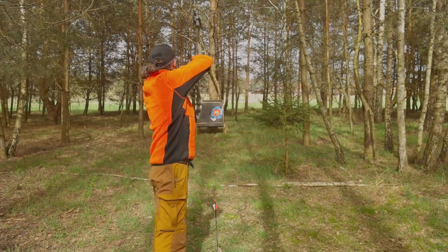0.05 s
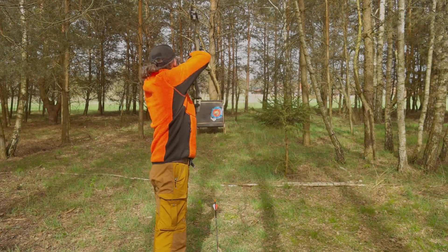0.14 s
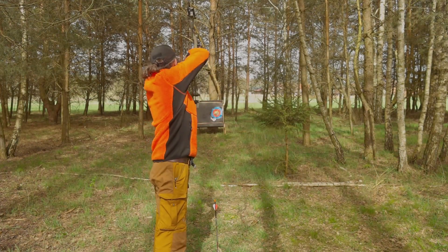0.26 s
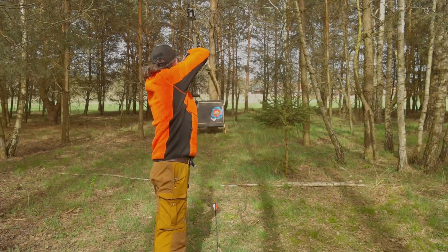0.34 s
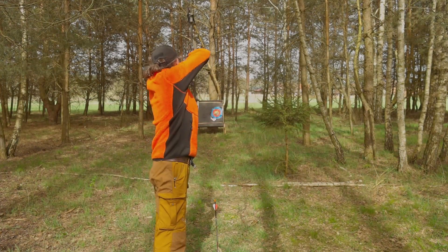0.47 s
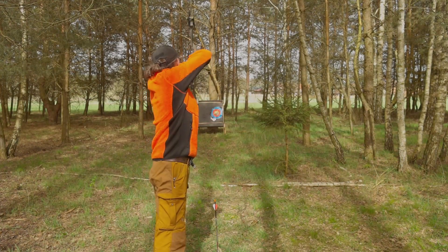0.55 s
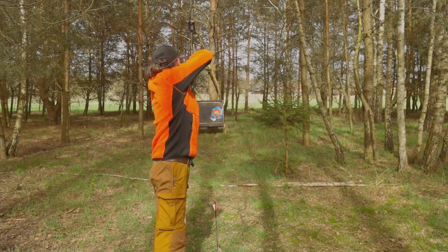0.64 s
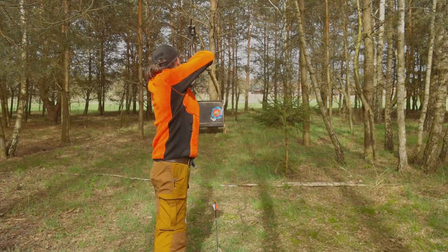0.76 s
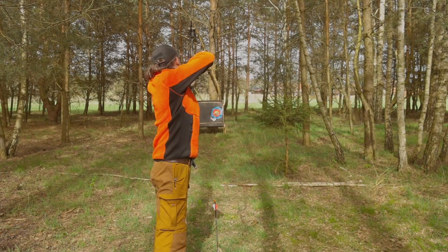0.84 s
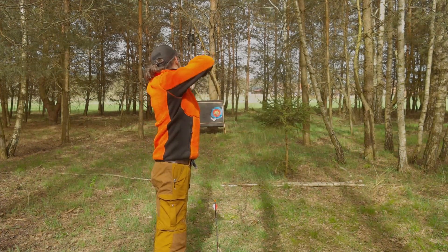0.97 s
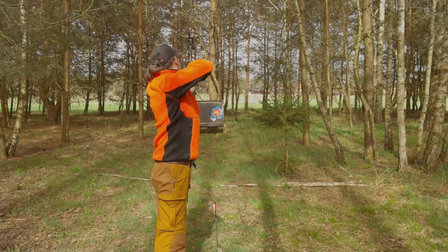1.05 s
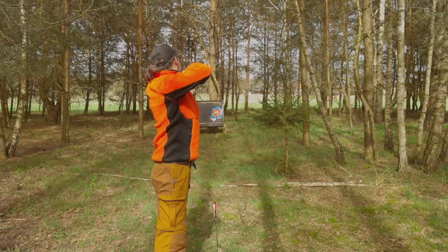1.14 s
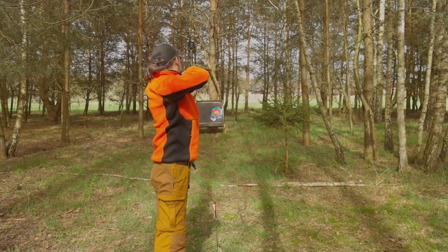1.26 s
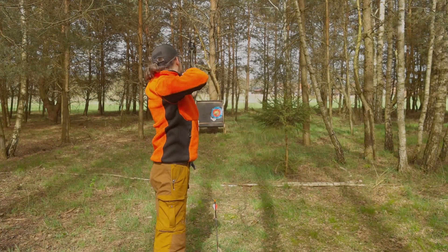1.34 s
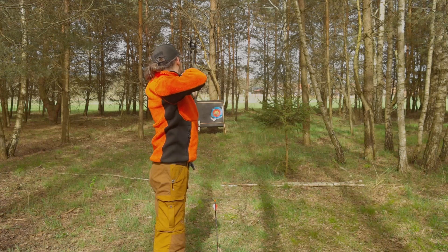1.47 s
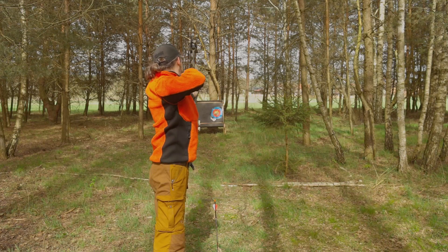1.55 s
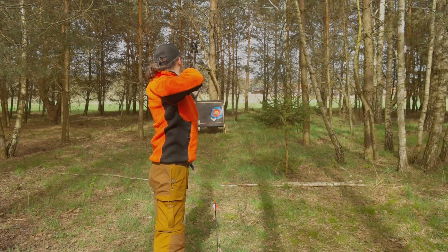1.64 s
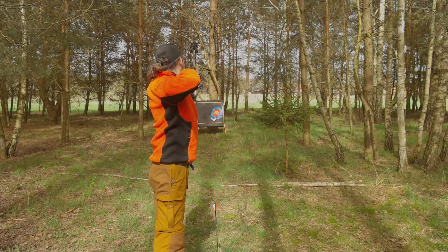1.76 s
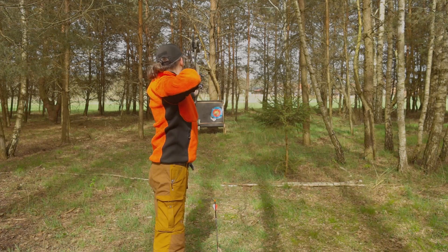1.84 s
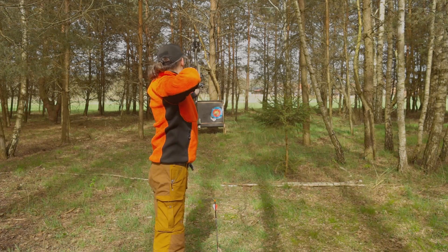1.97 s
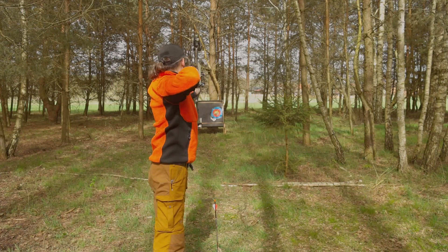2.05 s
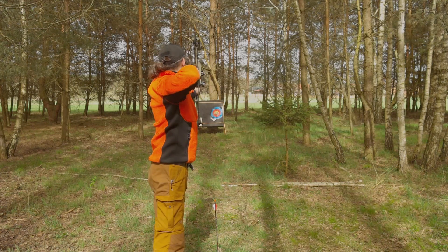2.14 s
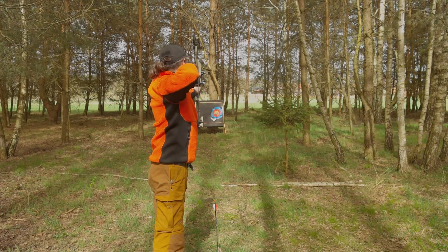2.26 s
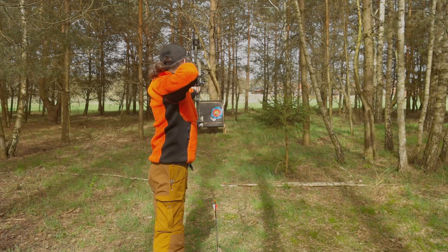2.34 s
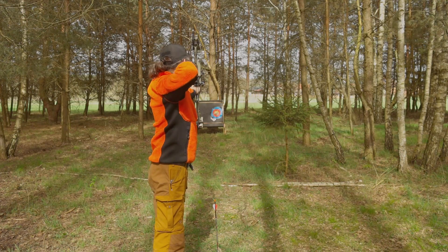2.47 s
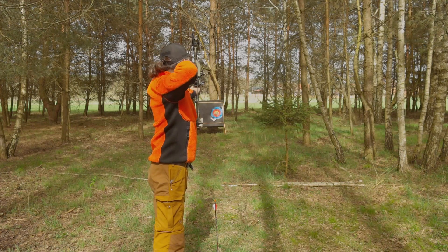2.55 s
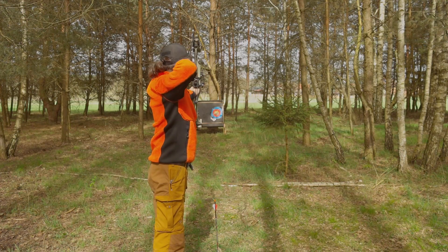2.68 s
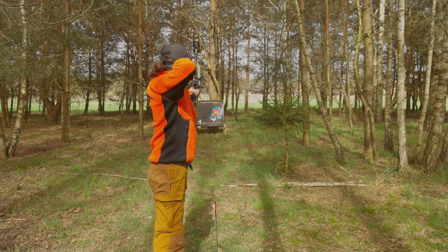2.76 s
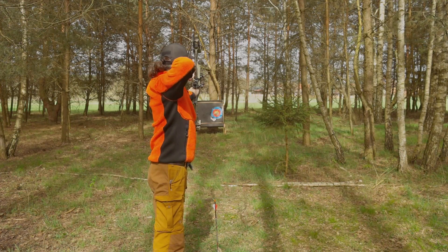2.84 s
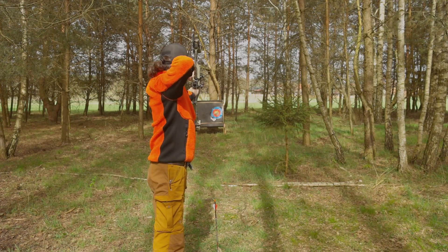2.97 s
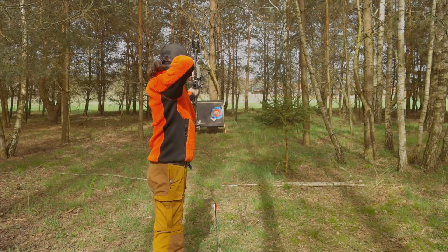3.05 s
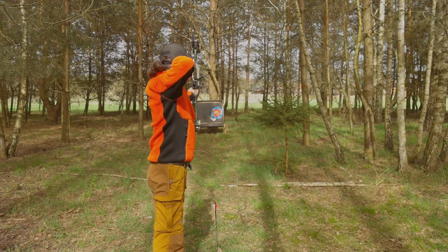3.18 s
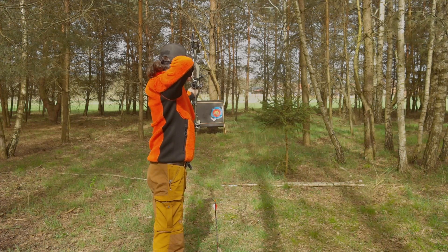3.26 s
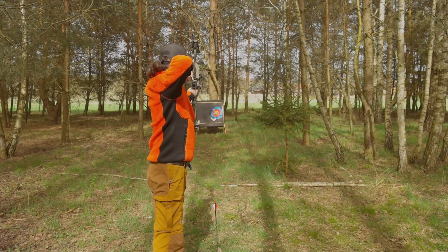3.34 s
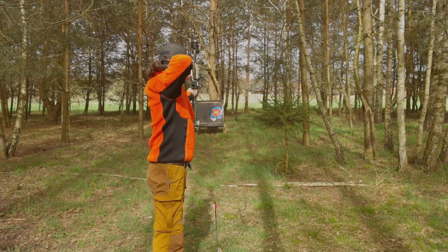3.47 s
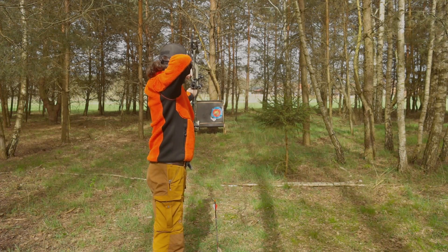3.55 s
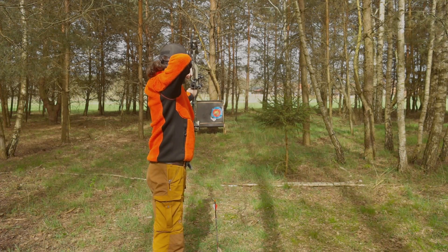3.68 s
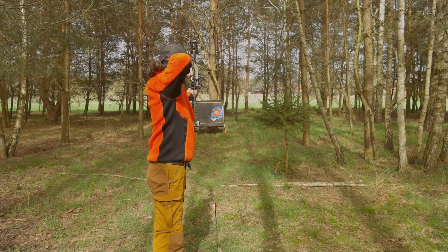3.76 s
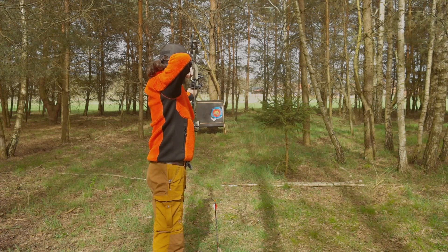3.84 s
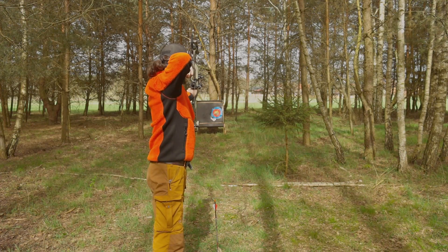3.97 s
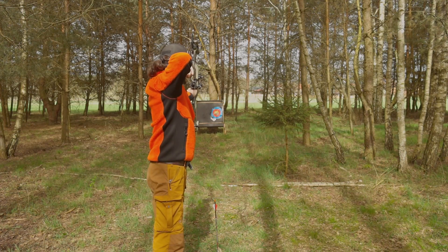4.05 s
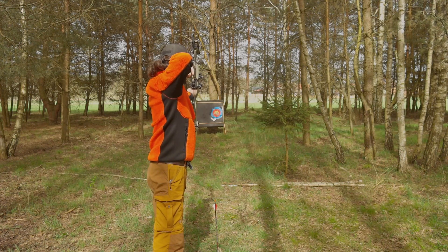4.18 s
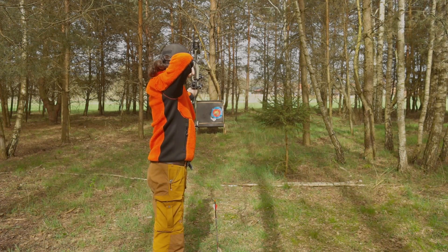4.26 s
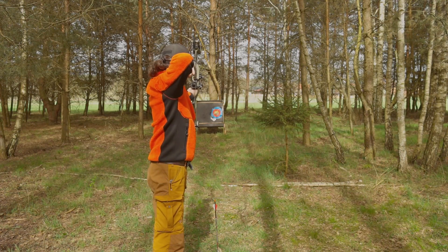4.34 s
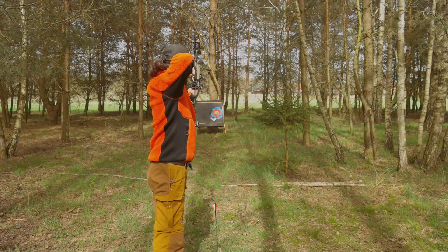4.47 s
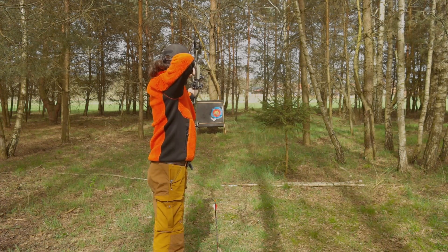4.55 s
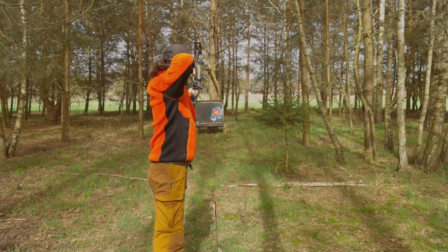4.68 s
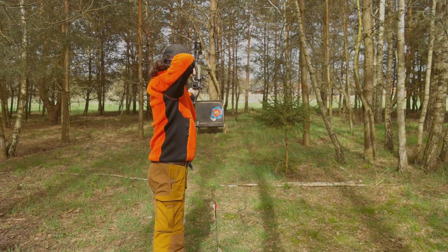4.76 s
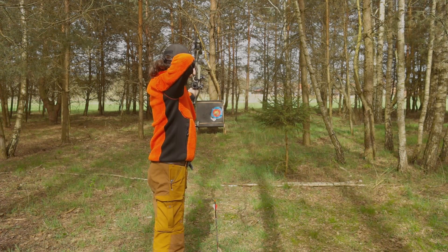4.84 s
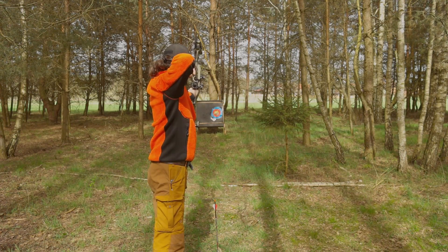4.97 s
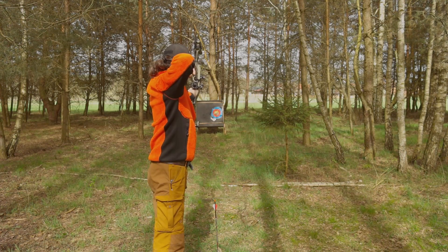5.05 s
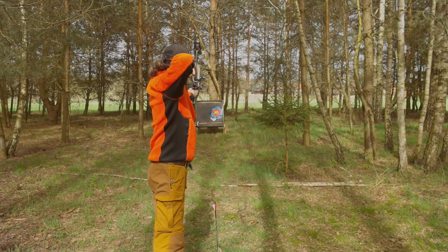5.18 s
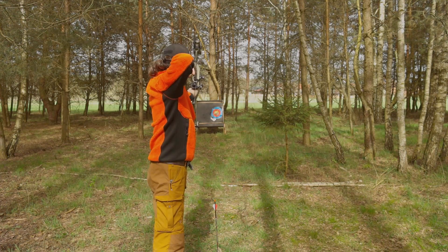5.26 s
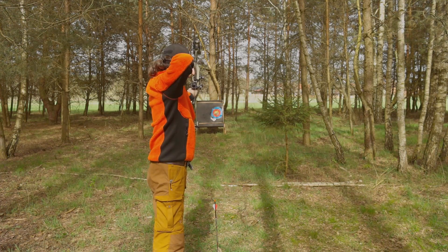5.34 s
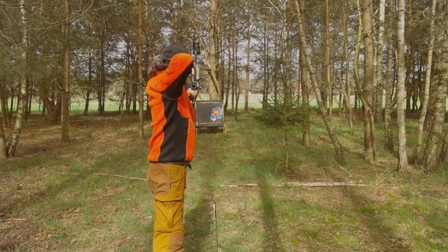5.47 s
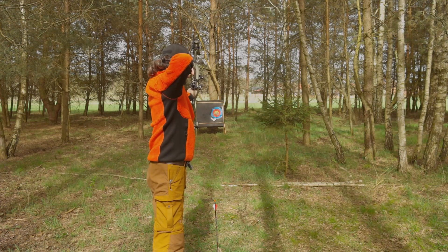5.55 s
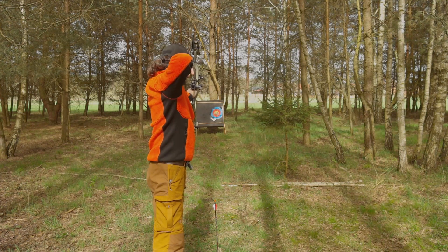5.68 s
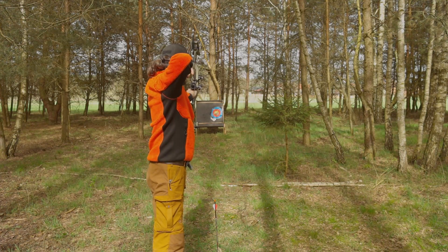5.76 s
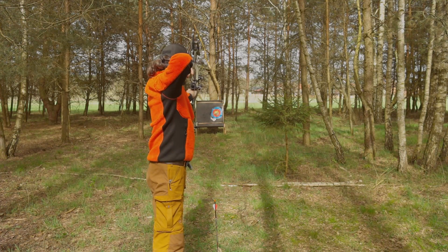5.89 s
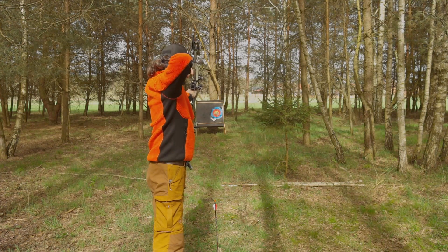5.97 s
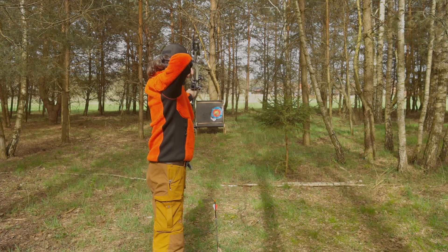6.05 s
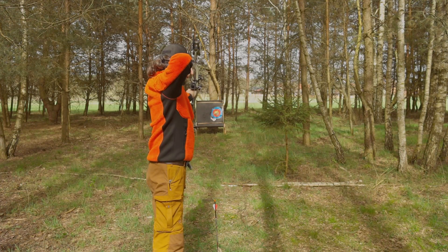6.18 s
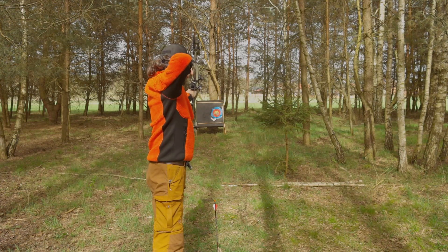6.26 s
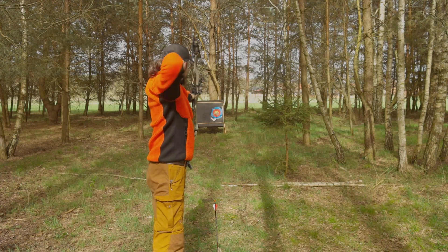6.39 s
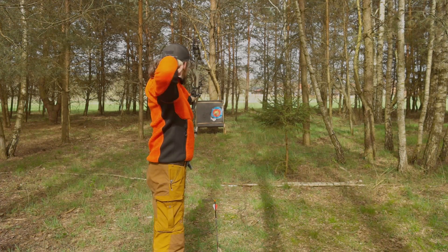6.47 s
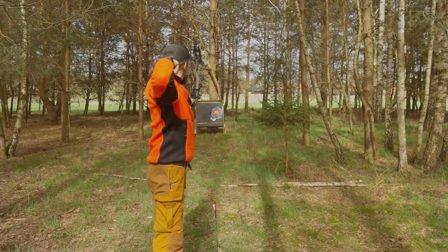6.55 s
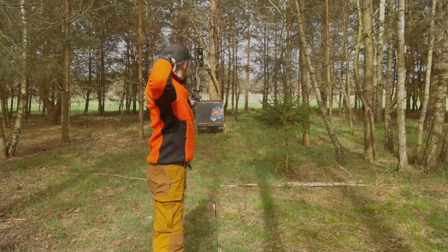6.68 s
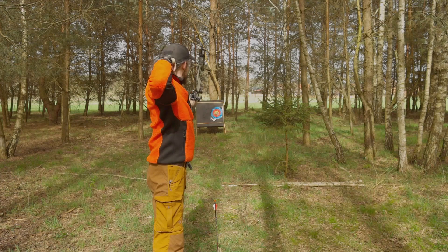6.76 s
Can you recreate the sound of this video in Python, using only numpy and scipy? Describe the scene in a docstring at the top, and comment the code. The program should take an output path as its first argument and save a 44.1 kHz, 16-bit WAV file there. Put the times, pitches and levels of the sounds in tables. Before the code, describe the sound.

Outdoors in a quiet wood with soft air noise, a distant animal call quavers and fades as cloth slides faintly. A songbird repeats a quick, high whistled phrase. The loaded bow gives small metallic ticks, then a few dull knocks. After a quiet hold, a tiny click precedes a very loud, dry crack, and the arrow smacks a block target almost at once. Trees return a short echo. Mono microphone near the archer.

```python
"""A quiet wood: a far call quavers and fades over soft air noise while an archer's sleeves slide.
A songbird repeats a three-note phrase of sliding sine whistles, and the loaded bow ticks in rings and noise.
The release clicks, the string whips forward as a rising sine and slams home in damped modes and noise,
and the arrow smacks into a block target. Noise tails from the trunks answer all but the air and sleeves."""
import sys
import numpy as np
from scipy import signal
from scipy.fft import rfft, irfft, next_fast_len
from scipy.io import wavfile
from scipy.ndimage import map_coordinates

SR = 44100
rng = np.random.default_rng(int(sys.argv[2]) if len(sys.argv) > 2 else 0)


def int16_out(signal):
    """Quantize to a 16-bit WAV file."""
    q = np.round(np.clip(np.atleast_2d(signal).T, -1, 1) * 32767)
    wavfile.write(sys.argv[1], SR, q.astype(np.int16))


N = 300762


def amp(db):
    """Turn decibels into a linear gain."""
    return 10 ** (np.asarray(db) / 20)


def unit(x):
    """Scale a signal to rms 1."""
    return x / np.sqrt(np.mean(x ** 2) + 1e-20)


def along(points, hz):
    """Read a curve of (Hz, value) points on a log frequency axis."""
    point_hz, values = np.transpose(points)
    return np.interp(np.log(hz + 1), np.log(point_hz + 1), values)


def wobble(rate, size=N):
    """A smooth random curve with rate knots a second."""
    knots = rng.standard_normal(int(size * rate / SR) + 4)
    return map_coordinates(knots, [np.arange(size) * rate / SR])


def filtered(x, response):
    """Shape a signal's spectrum by a gain that depends on frequency."""
    size = next_fast_len(len(x) + SR // 4)  # padded so that the end does not wrap round
    spectrum = rfft(x, size) * response(np.fft.rfftfreq(size, 1 / SR))
    return irfft(spectrum, size)[:len(x)]


def noise(colour, size=N):
    """Coloured noise of rms 1."""
    return unit(filtered(rng.standard_normal(size), lambda hz: amp(along(colour, hz))))


def add(track, s, sound):
    """Mix a sound into the track at s seconds."""
    room = track[round(s * SR):][:len(sound)]
    room += sound[:len(room)]


def highpass(x, cut_hz):
    """Thin out the bass below the cut-off."""
    return signal.sosfilt(signal.butter(N=2, Wn=cut_hz, btype="high", fs=SR, output="sos"), x)


def gate(t, length, attack, release):
    """Rise from t = 0, hold, and fall to nothing at t = length."""
    return np.clip(t / attack, 0, 1) * np.clip((length - t) / release, 0, 1)


def burst(colour, t60, attack):
    """Coloured noise that rises quickly and dies away by 60 dB in t60 seconds."""
    t = np.arange(SR // 2) / SR
    return noise(colour, len(t)) * amp(-60 * t / t60) * (1 - np.exp(-t / attack))


def ring(modes, detune=0):
    """Damped sines of a struck body; each builds up over about one cycle."""
    t = np.arange(SR // 2) / SR
    body = np.zeros(len(t))
    for hz, db, t60 in modes:
        envelope = amp(db - 60 * t / t60) * (1 - np.exp(-hz * t))
        body += envelope * np.sin(2 * np.pi * hz * (1 + detune * rng.normal()) * t)
    return body


def struck(blows, modes):
    """Each blow rings the same body; a softer contact passes less treble."""
    out, body = np.zeros(N), ring(modes)
    for s, db, cut_hz in blows:
        contact = signal.butter(N=4, Wn=cut_hz, fs=SR, output="sos")
        add(out, s, amp(db) * signal.sosfilt(contact, body))
    return out


def click(colour):
    """The shortest causal (minimum-phase) pulse with this colour, of peak 1."""
    size = 2048
    cepstrum = irfft(np.log(amp(along(colour, np.fft.rfftfreq(size, 1 / SR)))))
    # folding the cepstrum onto positive time gathers the energy at the start
    cepstrum[1:size // 2] *= 2
    cepstrum[size // 2 + 1:] = 0
    pulse = irfft(np.exp(rfft(cepstrum)))
    return pulse / np.abs(pulse).max()


def trunks(x, colour, onset=0.0075, lumpy=0.11):
    """The wood's answer: many uneven echoes swell in, with treble and bass dying first."""
    # How long the wood rings. Each row: frequency in Hz, time to fall by 60 dB in seconds.
    wood_t60 = [(100, 0.25), (400, 0.66), (1200, 0.68), (3000, 0.62), (6000, 0.79), (14000, 0.19)]
    t = np.arange(SR) / SR
    echoes = rng.standard_normal(SR) * np.exp(lumpy * wobble(254.5, size=SR))
    hz, s, bands = signal.stft(echoes, SR, nperseg=256)
    fade = amp(-60 * s / along(wood_t60, hz)[:, None])
    # give every band the same total energy, then colour it
    energy = SR * np.mean(fade ** 2, axis=1, keepdims=True)
    fade *= amp(along(colour, hz))[:, None] / np.sqrt(energy)
    tail = signal.istft(bands * fade / np.std(echoes), SR, nperseg=256)[1][:SR]
    return signal.fftconvolve(x, tail * (1 - np.exp(-(t / onset) ** 2)))[:N]


def air():
    """Air in the crowns murmurs as wavering noise over a low rumble with an opening gust, and a thin hiss."""
    # Noise colours. Each row: frequency in Hz, relative level per Hz in dB.
    murmur_colour = [(41, -34), (70, -5.5), (232, -6.5), (388, -2), (493, -0.5), (596, 0), (825, 1),
                     (1810, -3), (3140, -11.5), (3420, -12.5), (3730, -15), (3990, -17.5), (4200, -22),
                     (5460, -42), (9240, -120)]
    rumble_colour = [(10, -6), (25, 2.5), (60, 5), (100, -10), (200, -28)]
    hiss_colour = [(3000, -4.5), (4500, 2), (6000, 5.5), (8000, 1), (11000, -2.5), (16000, -4)]
    # The breeze in the crowns. Each row: time in seconds, level in dB before the murmur's lift.
    breeze = [(0.0, -63.5), (0.39, -64.5), (2.32, -65), (3.03, -64), (6.3, -65)]
    murmur_lift_db = 1.7
    rumble_db, gust_db, settle_s = -86, 10, 1  # steady level, gust above it, decay constant of the gust
    t = np.arange(N) / SR
    breeze_db = np.interp(t, *np.transpose(breeze))
    murmur = amp(breeze_db + murmur_lift_db + 0.22 * wobble(9)) * noise(murmur_colour)
    rumble_level = amp(rumble_db + gust_db * np.exp(-t / settle_s) + wobble(7.7))
    return murmur + rumble_level * noise(rumble_colour) + amp(-81.5) * noise(hiss_colour)


def sleeves():
    """Jacket cloth slides as uneven noise until the arm is back, then comes to rest."""
    # Cloth colour. Each row: frequency in Hz, relative level per Hz in dB.
    cloth_colour = [(500, 3.5), (1500, 4.5), (3000, -8), (4500, -4.5), (6000, -5), (9000, -15),
                    (15000, -48)]
    sliding_db, draw_end_s, fade_db_per_s = -75, 1.25, 9
    level_db = sliding_db - fade_db_per_s * np.maximum(np.arange(N) / SR - draw_end_s, 0)
    return amp(level_db + 2.6 * wobble(22.2)) * noise(cloth_colour)


def far_call():
    """A distant animal's quavering note sags and sinks in steps, strongest on its second harmonic."""
    # Steps of the call. Each row: start in seconds, length in seconds, starting pitch of the
    # fundamental in Hz, level of the second harmonic in dB (rms).
    call_steps = [(-.03, 0.5, 831, -63.5), (.385, 0.46, 801, -65), (0.858, 0.204, 805, -67.5),
                  (1.07, .14, 768, -74)]
    sag_hz_per_s, edge_s, echo_db, fundamental_db = 25, 0.026, -10, -11  # fundamental: below the second
    call = np.zeros(N)
    for s, length, pitch_hz, db in call_steps:
        t = np.arange(N) / SR - s
        hz = (pitch_hz - sag_hz_per_s * t) * (1 + 0.0041 * wobble(45.1))
        phase = 2 * np.pi * np.cumsum(hz) / SR
        quaver_db = 1.5 * wobble(55)
        level = amp(db + quaver_db) * gate(t, length, edge_s, edge_s)
        voice = np.sin(2 * phase) + amp(fundamental_db) * np.sin(phase)
        call += np.sqrt(2) * level * voice
    return call + trunks(call, [(1600, echo_db)], onset=.02)


def songbird():
    """Repeat a phrase of sliding sine whistles; the highest arrive mostly by way of the trees."""
    # Whistles of one phrase. Each row: start within the phrase in seconds, length in seconds, first pitch
    # in Hz, pitch it slides to in Hz, slide time constant in seconds, drift in Hz per second,
    # level relative to the song in dB.
    whistles = [(0, 0.054, 6800, 5280, .028, 0, -7.5), (.04, .085, 5200, 3360, .006, 2100, 1.3),
                (0.12, 0.036, 3450, 4700, .035, 0, -5), (0.364, 0.053, 6300, 4060, .006, 4400, -.5),
                (.402, .052, 4280, 3900, 0.0245, 0, 1), (.462, .04, 4950, 3800, .019, 0, -2),
                (.69, .085, 6800, 4340, .022, 0, -5.5), (.79, .042, 5500, 3900, .024, 0, -4)]
    # Each row: start of a phrase in seconds, spacing of its whistles as a ratio, direct path in dB.
    phrases = [(.795, 1.05, 0), (1.877, 1, -0.5), (2.915, 0.99, -.5), (3.935, 1.003, -3), (4.96, 1, -5)]
    # What reaches the ear straight, and by way of the trees. Each row: frequency in Hz, gain in dB.
    direct_colour = [(3400, -4), (4200, 1), (5000, -8), (6200, -2)]
    echo_colour = [(3500, -2.5), (4200, -2), (5000, 1.5), (6200, 3)]
    # the song swells to a peak, fades and breaks off
    peak_db, peak_s, end_s, rise_db_per_s, fade_db_per_s = -64, 1.85, 5.2, 7.5, 1.6
    attack_s, release_s, flicker_db = 0.01, 0.014, 2.8
    pitch_scatter, pitch_wobble = 0.0081, 0.0089  # shares of the pitch: per whistle, and within it
    song, direct = np.zeros(N), np.zeros(N)
    t = np.arange(SR // 8) / SR
    for start, spacing, direct_db in phrases:
        for offset, length, first_hz, held_hz, slide, drift, db in whistles:
            s = start + spacing * offset
            if s > end_s:
                break
            hz = held_hz + (first_hz - held_hz) * np.exp(-t / slide) + drift * t
            hz = hz * (1 + pitch_scatter * rng.normal() + pitch_wobble * wobble(99, size=len(t)))
            effort_db = peak_db - max(rise_db_per_s * (peak_s - s), fade_db_per_s * (s - peak_s))
            level = amp(effort_db + db + flicker_db * wobble(61, size=len(t)))
            level = level * gate(t, length, attack_s, release_s)
            whistle = level * np.sin(2 * np.pi * np.cumsum(hz) / SR)
            add(song, s, whistle)
            add(direct, s, amp(direct_db) * whistle)
    straight = filtered(direct, lambda hz: amp(along(direct_colour, hz)))
    return straight + trunks(song, echo_colour, onset=0.011)


def ticks(count=4):
    """Cables and cams settle under load: each tick mixes ring, snap, grit and knock, then a tiny rattle."""
    # Ticks of the loaded bow. Each row: start in seconds, level in dB, then relative to it the treble
    # in dB (snap and rattle add small offsets) and the dull knock in dB.
    tick_times = [(1.2339, -53, -6.5, -25), (1.3683, -49, -8, -25), (1.514, -48.5, -8, -22),
                  (1.5914, -49.5, -11, -25), (1.6808, -50, -10.5, -25), (1.7893, -55.5, -21, -20),
                  (2.4368, -48.5, -28, -6.5), (3.0946, -49, -26, -6), (4.8489, -56, -24, -11),
                  (4.967, -67, -8, -20), (5.138, -64.5, -9.5, -18)]
    # Metal parts. Each row: frequency in Hz, relative level in dB, time to fall by 60 dB in seconds.
    metal_modes = [(2990, 3, 0.062), (3480, -4, 0.04), (3880, 0.5, 0.05), (5110, -9, .05), (5600, -11, .04),
                   (6060, -6, 0.098)]
    # Noise colours. Each row: frequency in Hz, relative level per Hz in dB.
    snap_colour = [(2000, -9), (3000, 0), (4500, -6), (6000, -2), (7500, -8), (10000, -1), (12500, -14),
                   (16000, -10)]
    knock_colour = [(200, -12), (700, 6), (1500, -5), (3200, 1), (5000, -16), (12000, -33)]
    grit_colour = [(200, -18), (700, -10), (2200, -10), (3300, 6.5), (4500, -12), (6000, -3),
                   (9000, -20), (15000, -32)]
    out = np.zeros(N)
    for s, db, treble_db, knock_db in tick_times:
        snap = amp(treble_db + 3.5) * burst(snap_colour, t60=0.048, attack=.0003)
        grit = amp(-10) * burst(grit_colour, t60=0.045, attack=0.00025)
        metal = amp(-14) * ring(metal_modes, detune=.004)
        knock = amp(knock_db) * burst(knock_colour, t60=0.037, attack=0.00026)
        add(out, s, amp(db) * (metal + snap + grit + knock))
        for delay in rng.uniform(0.0028, 0.022, count):
            rattle_db = db + treble_db + 0.5 - 200 * delay  # later grains are quieter
            add(out, s + delay, amp(rattle_db) * burst(snap_colour, t60=0.01, attack=.0001))
    return out + trunks(out, [(3000, -11), (10000, -9)])


def string_whip():
    """The string's whistle climbs with its speed: a rising sine that swells and drops within 10 ms."""
    start_hz, rise_hz_per_s = 1500, 303000
    peak_s, peak_db, slope_db_per_s = .0052, -35, 6000
    t = np.arange(SR // 100) / SR
    hz = start_hz + rise_hz_per_s * t
    level = amp(peak_db - slope_db_per_s * np.abs(t - peak_s))
    return level * np.sin(2 * np.pi * np.cumsum(hz) / SR)


def bow():
    """The release opens, the string whistles up to speed and stops dead; limbs ring and fittings buzz."""
    # Blows as the string slams home and rebounds. Each row: start in seconds, gain in dB,
    # contact cut-off in Hz.
    slams = [(6.3474, 4, 9000), (6.3513, -15, 2480), (6.3568, -16, 6000), (6.3812, -18, 2000)]
    # Limbs, riser and cables. Each row: frequency in Hz, level in dB before the blow's gain,
    # time to fall by 60 dB in seconds.
    bow_modes = [(229, -37, 0.09), (402, -33.5, 0.1), (533, -45, 0.064), (596, -35, 0.065), (720, -31, .11),
                 (828, -34.5, 0.096), (956, -34, 0.052), (1168, -15, 0.011), (1268, -28, 0.045),
                 (1410, -25, 0.019), (1810, -47.5, 0.18), (2780, -55, 0.07), (2920, -52, 0.13),
                 (3180, -37.5, 0.069), (3490, -42.5, 0.086), (3940, -48, .07)]
    # Noise colours of release, string and fittings. Each row: frequency in Hz, relative level per Hz in dB.
    trigger_colour = [(100, -33), (400, -3), (1000, -2), (3000, 4), (4300, -4), (5800, 8), (7500, -7),
                      (9500, 5), (12000, -6), (16000, -16)]
    crack_colour = [(300, -24), (700, -7), (1300, 2), (2000, -4), (3000, 0.5), (4300, -6), (5500, 1),
                    (7000, -10.5), (9000, -5.5), (12500, -10), (14000, -22), (16000, -28)]
    buzz_colour = [(100, -36), (250, 2), (800, 8), (1400, 1), (2200, -2.5), (3200, 3.5), (4400, -11.5),
                   (5800, -5.5), (7200, -14), (9000, -14.5), (12500, -28), (16000, -27)]
    brush_colour = [(2000, -23), (5000, 4), (12000, -6), (16000, -17)]
    push_colour = [(100, -35), (220, -2), (450, 3), (1200, 14), (4000, -27)]
    # What the trunks send back of the bow. Each row: frequency in Hz, gain in dB.
    echo_colour = [(150, -28), (700, -23), (1400, -21.5), (2200, -8), (3200, -14.5), (4400, -15),
                   (5600, -11.5), (8000, -13.5), (14000, -18)]
    out = struck(slams, bow_modes)
    # the trigger trips, then the jaw lets go
    add(out, 6.3218, amp(-61) * burst(trigger_colour, t60=.012, attack=0.00025))
    add(out, 6.3246, amp(-51.0) * burst(trigger_colour, t60=0.1, attack=.0001))
    add(out, 6.339, string_whip())
    # the shaft brushes the rest and the limbs push the air just before the stop
    add(out, 6.3425, amp(-56) * burst(brush_colour, t60=0.068, attack=0.00074))
    add(out, 6.3456, amp(-29.5) * burst(push_colour, t60=0.042, attack=0.0011))
    # the string snaps taut: one sharp pulse inside a brief spray of contacts
    add(out, 6.3484, -amp(-13) * click(crack_colour))
    add(out, 6.3478, amp(-23.0) * burst(crack_colour, t60=0.0093, attack=0.00017))
    # the fittings buzz
    add(out, 6.3495, amp(-32) * burst(buzz_colour, t60=0.16, attack=0.0017))
    out = highpass(out, 130)  # the bow's sound is thinned out below 130 Hz
    return out + trunks(out, echo_colour, onset=0.017)


def arrow():
    """The arrow rings block and shaft in short damped modes, with a sharp noise smack and a dull thump."""
    # The point pierces the face, then the block stops the shaft. Each row: start in seconds, gain in dB,
    # contact cut-off in Hz.
    hits = [(6.4935, 3, 12000), (6.4967, 16, 1150), (6.5046, -7.5, 3500)]
    # Block and shaft. Each row: frequency in Hz, level in dB before the hit's gain,
    # time to fall by 60 dB in seconds.
    target_modes = [(65, -59, .1), (127, -48.5, 0.1), (278, -36.5, 0.032), (550, -46, 0.019),
                    (822, -31, 0.015), (990, -21, 0.011), (1187, -28.5, 0.011), (2650, -21.5, 0.008),
                    (2860, -30, 0.012), (5500, -29.5, 0.0073), (8300, -35.5, 0.0039)]
    # What the trunks send back of the target. Each row: frequency in Hz, gain in dB.
    echo_colour = [(100, -11), (300, -23), (500, -7), (900, -23), (1700, -4.5), (2700, -10.5), (3500, -5.5),
                   (4300, -17.5), (5500, -21), (7500, -19), (14000, -16)]
    smack_colour = [(200, -15), (1500, -15), (4300, -4), (5500, 11), (7000, -11), (9000, -11),
                    (13000, -1), (16000, -21)]
    thump_colour = [(30, -9), (200, 3), (1000, -1.5), (1900, -2.5), (2800, -21), (4200, -20),
                    (6000, -21), (14000, -42)]
    out = struck(hits, target_modes)
    add(out, 6.4937, amp(-38) * burst(smack_colour, t60=0.0067, attack=.0001))
    add(out, 6.498, amp(-37) * burst(thump_colour, t60=0.11, attack=0.0012))
    out = highpass(out, 55)  # the block is too small to radiate deep bass
    return out + trunks(out, echo_colour, onset=0.019)


def scene():
    """Sum every source into one channel."""
    return (air() + sleeves() + far_call() + songbird() + ticks() + bow() + arrow())[None]


def record(dry):
    """Keep only what lies below the band limit."""
    top_hz = 15800
    return np.array([filtered(channel, lambda hz: hz < top_hz) for channel in dry])


dry = scene()
out = record(dry)
int16_out(out)
```